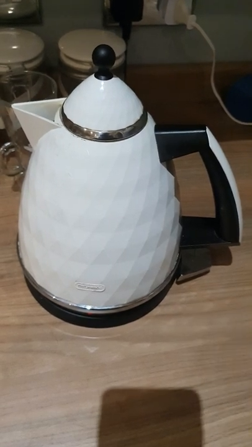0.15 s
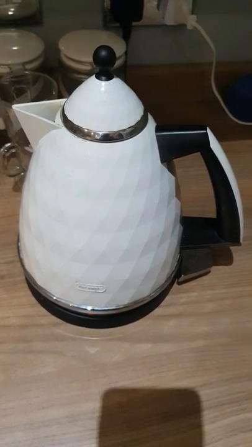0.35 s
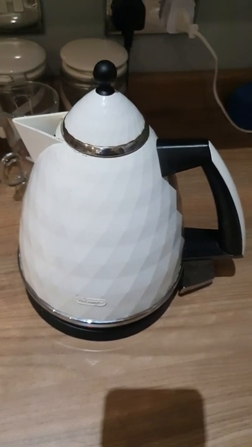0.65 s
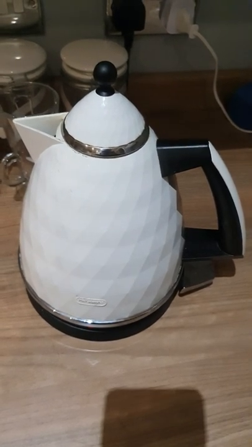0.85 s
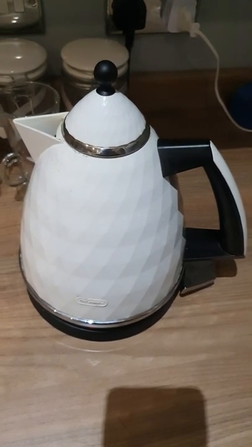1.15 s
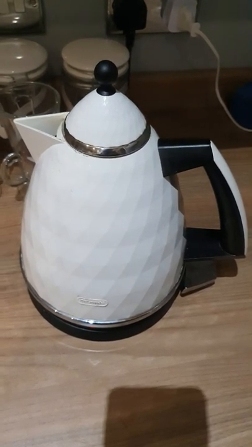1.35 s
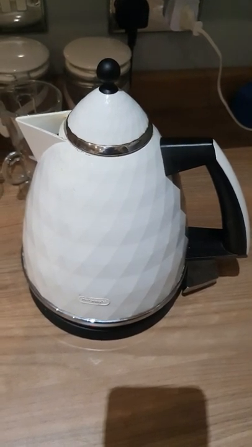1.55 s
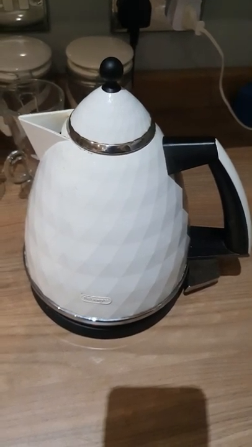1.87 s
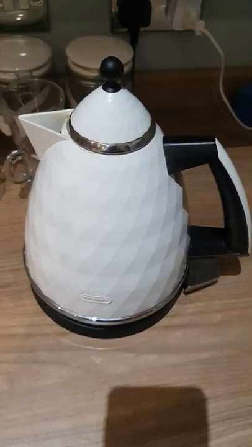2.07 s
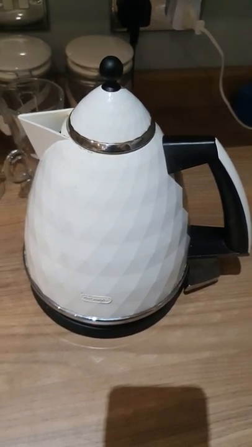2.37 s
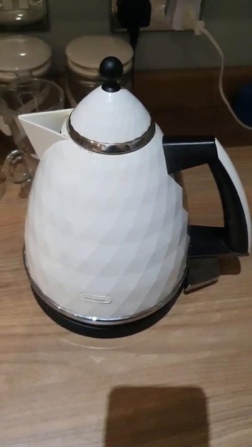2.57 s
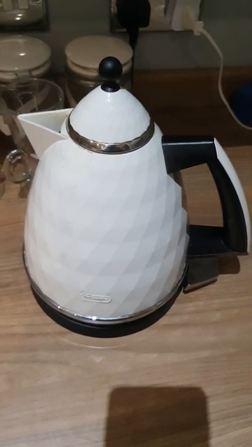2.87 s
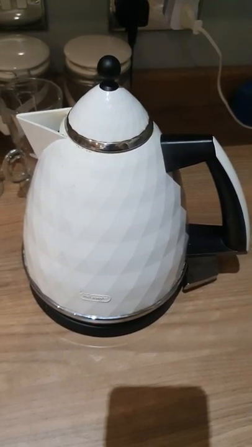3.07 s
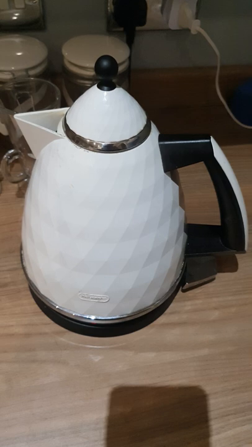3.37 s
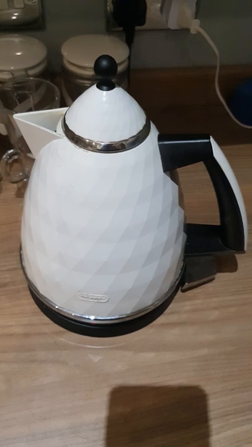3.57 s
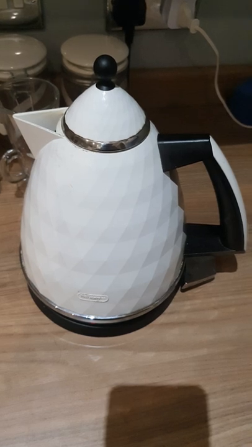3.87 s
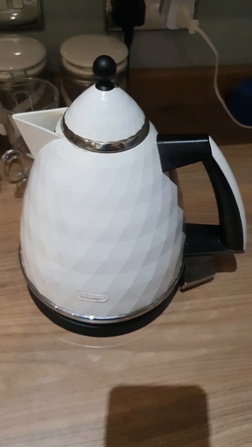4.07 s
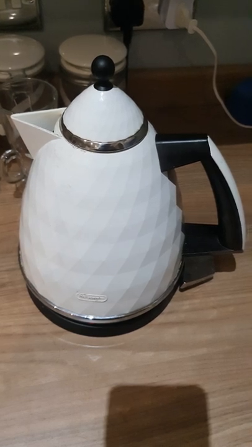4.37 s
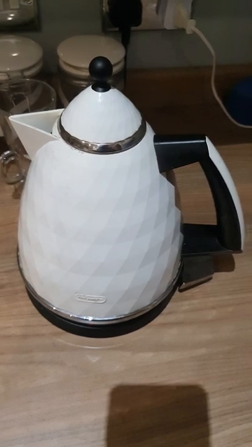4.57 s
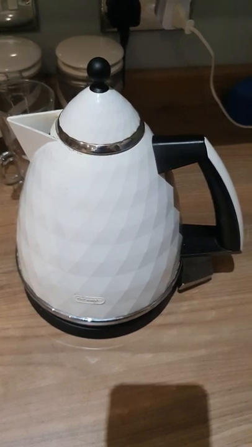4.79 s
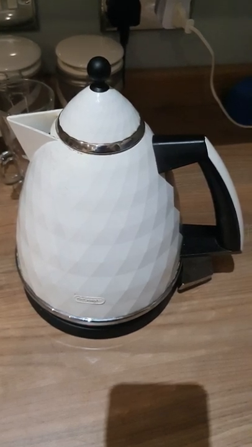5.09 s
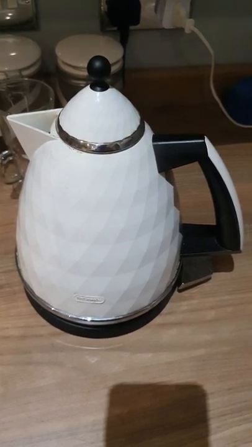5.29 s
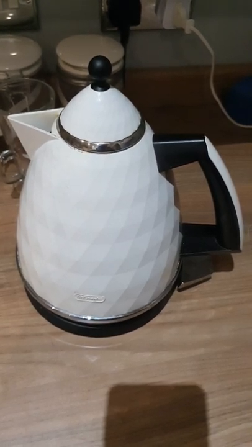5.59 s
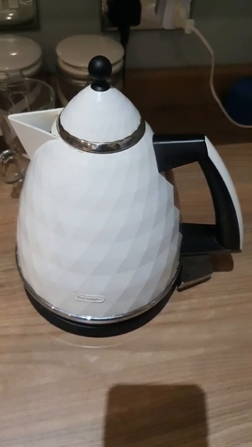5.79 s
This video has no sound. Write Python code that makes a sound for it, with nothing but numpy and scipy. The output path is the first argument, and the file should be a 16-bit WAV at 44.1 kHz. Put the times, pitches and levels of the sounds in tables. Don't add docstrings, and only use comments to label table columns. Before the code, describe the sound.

A handheld phone close to a kettle hears crisp, airy sizzling at first, then its tone abruptly drops to muffled and bassy. The base hums and throbs at a wavering low pitch over deeper thuds in the worktop, with a steady grainy simmer above. Near the middle, skin rubs softly and the case ticks a few times, mostly on the right. It never reaches a full boil and stops abruptly.

```python
import sys
import numpy as np
from scipy import signal
from scipy.fft import rfft, irfft, dct, next_fast_len
from scipy.io import wavfile
from scipy.ndimage import uniform_filter1d

SR = 44100
rng = np.random.default_rng(int(sys.argv[2]) if len(sys.argv) > 2 else 0)


def waveform_to_disk(signal):
    frames = np.transpose(np.atleast_2d(signal))
    scaled = np.clip(frames, -1, 1) * 32767
    samples = np.round(scaled).astype(np.int16)
    wavfile.write(sys.argv[1], SR, samples)


def ratio_of_db(decibels):
    return 10 ** (np.asarray(decibels, float) / 20)


N = 261954
SIZE = next_fast_len(N)
HZ = np.arange(SIZE // 2 + 1) * SR / SIZE
TIME = np.arange(N) / SR
SWITCH_S = 0.6195


def curve(table):
    s, *columns = np.transpose(table)
    return [np.interp(TIME, s, c) for c in columns]


def shape(table, grid_hz=HZ):
    hz, *columns = np.transpose(table)
    return np.array([np.interp(np.log(grid_hz + 1), np.log(hz), c) for c in columns])


def walk(rate_hz):
    hold = int(SR / rate_hz)
    steps = np.repeat(rng.standard_normal(N // hold + 1), hold)
    slewed = uniform_filter1d(uniform_filter1d(steps, hold), hold)
    return 1.43 * slewed[:N]


def swells(rows, rise_db_s, fall_db_s, rest_db):
    level_db = np.full(N, float(rest_db))
    for start_s, hold_s, peak_db, *_ in rows:
        early_s = np.maximum(start_s - TIME, 0)
        late_s = np.maximum(TIME - start_s - hold_s, 0)
        level_db = np.maximum(level_db, peak_db - rise_db_s * early_s - fall_db_s * late_s)
    return level_db


def collapses(level_db):
    return rfft(rng.standard_normal(N) * ratio_of_db(level_db), SIZE) * np.sqrt(SR / 2)


def ring(hz, width_hz):
    return 1 / (1 + 1j * (HZ ** 2 - hz ** 2) / ((HZ + 1) * width_hz))


def whine():
    tone = irfft(collapses(0) * ring(5815, 220) ** 2, SIZE)[:N]
    return tone / np.std(tone) * ratio_of_db(-81) * (TIME < SWITCH_S)


# (start [s], length [s], centre [Hz], width [Hz], level [dB])
BRUSH = [(2.85, 0.094, 1700, 900, -41.5), (2.855, 0.18, 6050, 1340, -63), (2.92, 0.06, 6300, 500, -67),
         (2.908, .13, 11790, 2800, -70), (4.277, 0.31, 4920, 352, -63), (4.268, .31, 5430, 1800, -60),
         (4.303, 0.27, 6600, 400, -64), (4.322, .12, 12430, 2201, -80), (4.46, .12, 13800, 1204, -75),
         (4.47, .09, 6000, 1200, -68), (4.56, .1, 6300, 1000, -72)]
# (start [s], length [s], level [dB])
FLICKS = [(.72, 0.055, -70), (.85, 0.078, -69), (1.68, 0.091, -70), (2.437, .04, -65),
          (2.555, 0.057, -65.5), (2.702, .07, -68), (3.691, 0.051, -67), (4.699, 0.077, -66),
          (5.056, .05, -65), (5.359, 0.041, -63), (5.68, .1, -71)]
# (time [s], peak [dB], ring [Hz])
TICKS = [(2.2286, -48, 6070), (3.1033, -50, 6540), (3.3775, -54.5, 5830), (3.4293, -61, 6290),
         (3.4815, -60.5, 5970), (3.707, -57, 6480)]


def finger():
    out = np.zeros((2, N))
    skin = rfft(rng.standard_normal((2, N)) * ratio_of_db(walk(64)), SIZE)
    flick_hz, flick_width_hz = 6620, 620
    flick_left_db, slide_left_db = -5.5, -13.5
    touches = [(*row, slide_left_db) for row in BRUSH]
    for start_s, length_s, right_db in FLICKS:
        touches.append((start_s, length_s, flick_hz, flick_width_hz, right_db, flick_left_db))
    for start_s, length_s, hz, width_hz, right_db, left_db in touches:
        inside_s = np.minimum(TIME - start_s, start_s + length_s - TIME)
        edge = np.clip(inside_s / (0.022 + 0.36 * length_s) + 0.48, 0, 1)
        hiss = irfft(skin * np.exp(-np.abs((HZ - hz) / width_hz) ** 3), SIZE)[:, :N]
        out += edge ** 2 * hiss / np.std(hiss) * ratio_of_db(right_db + np.array([[left_db], [0]]))
    for start_s, peak_db, hz in TICKS:
        age_s = TIME - start_s
        tick = np.cos(2 * np.pi * hz * age_s) * np.exp(-(age_s / 0.00057) ** 2)
        out += tick * ratio_of_db(peak_db + np.array([[-9], [3]]))
    return out


# (start [s], hold [s], level [dB], pitch [Hz])
SURGES = [(.13, 0, -32.5, 122), (.28, 0, -28, 113.3), (.46, 0.1, -39.5, 122.2), (.64, 0.024, -21.5, 111.3),
          (.73, 0, -16, 111.9), (0.861, 0.34, -23, 114.7), (1.273, 0.12, -23, 113),
          (1.546, 0.078, -21, 113.1), (1.705, 0.18, -21.5, 116.5), (1.948, 0.052, -21.5, 113),
          (2.128, 0.068, -36.5, 112.2), (2.272, 0.18, -26, 117.7), (2.63, 0.0078, -17.5, 115),
          (2.746, 0.21, -20.5, 113.6), (3.027, 0.12, -21.5, 115.4), (3.26, 0.02, -29, 117.3),
          (3.37, 0.0097, -24.5, 118.6), (3.537, 0.045, -22.5, 114.7), (3.738, .33, -26.5, 118.5),
          (4.186, 0.059, -26.5, 115.9), (4.38, 0.011, -15, 115.9), (4.6, 0.018, -19, 115.8),
          (4.78, 0.014, -18, 115.9), (4.879, 0.11, -25.5, 117.5), (5.08, 0.0062, -20, 116.7),
          (5.211, 0.024, -18.5, 118.1), (5.285, 0.11, -24.5, 113.1), (5.54, 0.008, -21, 120.4),
          (5.627, 0.21, -31, 118), (5.93, 0.058, -17.5, 124)]
# (time [s], depth [dB])
STALLS = [
    (1.21, 18),
    (2.05, 4),
    (4.131, 8.5),
    (5.04, 7.5),
    (5.14, 35),
]
# (start [s], hold [s], level [dB])
THUDS = [(.45, 0, -39), (.63, 0.0021, -40), (.83, 0, -34.5), (1.11, 0, -34.5), (1.36, 0.0018, -43.5),
         (1.75, 0.17, -40), (2.2, 0, -30.5), (2.46, 0, -38), (2.68, 0.28, -39), (3.27, .25, -37.5),
         (4.25, 0.014, -38.5), (4.62, 0.072, -38), (4.81, 0.00058, -36), (5.13, 0, -37), (5.5, 0.073, -35),
         (5.74, 0, -36), (5.94, 0, -29)]
# (centre [Hz], width [Hz], level [dB per Hz])
WORKTOP = [(78, 24, -55.5), (99.5, 12, -49), (114.7, 23.6, -45.5), (130.26, 12.5, -41.5), (149, 17.4, -45),
           (177.3, 24, -58)]


def boom():
    bright = TIME < SWITCH_S
    lost_db = 15 * bright

    (hz,) = curve([(start_s + hold_s / 2, pitch_hz) for start_s, hold_s, _, pitch_hz in SURGES])
    boom_db = swells(SURGES, rise_db_s=231.5, fall_db_s=199, rest_db=-44)
    stall_s = 0.06
    for s, depth_db in STALLS:
        boom_db = boom_db - depth_db * np.clip(1 - np.abs(TIME - s) / stall_s, 0, 1)
    phase = 2 * np.pi * np.cumsum(hz) / SR + 0.48 * walk(22)
    swing = np.sqrt(2) * ratio_of_db(boom_db + lost_db - 1 + 1.2 * walk(25)) * np.sin(phase)

    rumble_db = swells(THUDS, rise_db_s=90.5, fall_db_s=112, rest_db=0 * SWITCH_S - 42)
    rest_db = -42 - 5.5 * bright
    rumble_db = np.where(rumble_db > -42, rumble_db, rest_db)
    rumble_db = np.maximum(rest_db, swells(THUDS, rise_db_s=90.5, fall_db_s=112, rest_db=-200))
    rumble = irfft(collapses(0) * ring(49, 22) * ring(60, 30), SIZE)[:N]
    rumble = rumble / np.sqrt(uniform_filter1d(rumble ** 2, int(0.12 * SR)))
    rumble = rumble * ratio_of_db(rumble_db + 0.69 * lost_db - 0.5)

    top = 0
    for centre_hz, width_hz, db in WORKTOP:
        top = top + ratio_of_db(db) * collapses(0) * ring(centre_hz, width_hz) * ring(centre_hz, 1.47 * width_hz)
    top = irfft(top, SIZE)[:N] * ratio_of_db(0.084 * (boom_db + lost_db + 28.5))

    bass = rfft(swing + rumble + top, SIZE)
    bass = irfft(bass / (1 + (28 / (HZ + 1)) ** 6), SIZE)[:N]
    return np.array([bass, ratio_of_db(0.2) * np.roll(bass, 2)])


# (time [s], level [dB])
SIMMER = [
    (0, -1.5),
    (.23, -1.5),
    (.4, 0),
    (.7, 2),
    (.85, 2.5),
    (1.3, 1),
    (2.5, 0.5),
    (3.9, -.5),
    (5.1, -1),
    (5.94, -0.5),
]
# (start [s], hold [s], level [dB])
BURSTS = [(.45, 0.25, -26), (.99, 0, -30), (1.14, 0, -28), (1.44, 0, -38.5), (1.7, .15, -27.5),
          (2.41, 0, -33), (3.5, 0.17, -35), (4.13, 0.024, -35), (4.58, 0.012, -27), (5.26, 0.13, -28.5),
          (5.77, 0.0079, -35.5)]
# (centre [Hz], width [Hz], left [dB per Hz], right [dB per Hz], right phase [rad])
SHELL = [(247.4, 25.4, -58, -57.5, 0.49), (305.6, 27.6, -56.5, -52.5, -0.5), (346, 18.2, -62.5, -52, 0.47),
         (376, 29, -53, -52, -0.45), (401.2, 22.3, -59, -55.5, 0.6), (480.2, 35, -69, -64, 0.2),
         (681, 100, -81, -77, 0.63), (789, 80, -70.5, -77, 0.5), (837, 64, -85, -65, 0.45),
         (1023, 100, -75.5, -71, 3.5), (1138, 62, -78.5, -68.5, 3.5), (1249, 82, -82, -73.5, -2.5),
         (1465, 50, -75.5, -77, -2), (1643, 130, -81.5, -78, -1.5), (2122, 190, -78, -91, -2.5),
         (2322, 74, -85, -80.5, -1), (2506, 97, -74.5, -83, -2), (2800, 110, -91.5, -85, -1.5),
         (3556, 110, -89.5, -90.5, 4.5), (4070, 260, -93.5, -91, 1.75), (4625, 340, -101, -100.5, -2),
         (5970, 270, -106, -103, 2.0), (6600, 500, -107, -102, 1.5)]
# (frequency [Hz], left [dB per Hz], right [dB per Hz], side minus mid [dB])
WASH = [(130, -95.5, -92, -20), (203, -72, -66.5, -8), (460, -75.5, -70.5, -5), (1000, -77, -78, -0.5),
        (1870, -84, -90.5, -2.5), (2980, -90.5, -96, -5), (4980, -102, -101, -1.5), (6800, -107, -104, 5),
        (7370, -120, -122, -7.5), (8200, -119, -126, -1.5), (9200, -112, -120, 3.5),
        (11400, -114, -116, 1.5), (12000, -117, -117, 3.5), (15600, -120, -121, -7.5)]


def simmer():
    (sizzle_db,) = curve(SIMMER)
    shell_db = swells(BURSTS, rise_db_s=79, fall_db_s=110, rest_db=-43)
    shell_db = 0.15 * (shell_db - np.mean(shell_db))
    surge_db = 0.43 * walk(30) + 0.53 * walk(90) + 1.3 * walk(500)

    rung = 0
    for hz, width_hz, left_db, right_db, phase_rad in SHELL:
        high = np.clip(hz / 1200, 0, 1)
        drive = collapses((1 - high) * shell_db + high * (sizzle_db + surge_db))
        ports = np.array([[ratio_of_db(left_db)], [ratio_of_db(right_db) * np.exp(1j * phase_rad)]])
        rung = rung + ports * (drive * ring(hz, width_hz) * ring(hz, 1.85 * width_hz))
    rung = rung / (1 + (HZ / 6880) ** 40)

    *ports_db, side_db = shape(WASH)
    wash_db = sizzle_db + 0.39 * surge_db
    norm = np.sqrt(1 + ratio_of_db(2 * side_db))
    mid = collapses(wash_db) / norm
    side = collapses(wash_db) * ratio_of_db(side_db) / norm
    wash = ratio_of_db(np.array(ports_db)) * np.array([mid + side, mid - side])
    return irfft(rung + wash, SIZE)[:, :N]


def scene():
    return whine() + finger() + boom() + simmer()


def band_limit(x):
    return signal.sosfilt(signal.butter(12, 15740, fs=SR, output="sos"), x)


# (frequency [Hz], left [dB], right [dB])
BRIGHT = [(30.37, -10.5, -10), (65, -14.5, -14), (142, -13, -15.5), (203, -12, -9.5), (291, 3, 4),
          (416, 1.5, -1.5), (523, 8, 10.5), (576, 8.5, 5), (960, 11, 10.5), (1070, 16, 11.5),
          (2440, 16, 18.5), (6800, 22, 18), (8000, 25, 22.5), (15600, 21.5, 22)]
# (centre [Hz], width [Hz], left [dB], right [dB])
AIM = [(1337, 63, 0.5, 4.5), (1530, 150, -2, -5), (1940, 78, 2, 4), (2070, 80, -4, -6), (2492, 65, -5, -9),
       (3210, 70, 10, 3), (3510, 130, -4, -2), (4060, 50, -2, -7), (7250, 148, 3, 5), (297, 44, 1.5, 1.5),
       (390, 30, -2.5, 0), (5800, 76, 1.5, 8), (2400, 65, 1.5, -1.5), (14500, 1500, 4.5, 4)]


def record(dry):
    size, lag = 2 ** 15, 6
    head = np.array([np.roll(dry[0], lag), dry[1]])[:, lag:size + lag]
    grid_hz = np.arange(size) * SR / (2 * size)
    gain_db = shape(BRIGHT, grid_hz)
    for hz, width_hz, *ports_db in AIM:
        gain_db = gain_db + np.outer(ports_db, np.exp(-((grid_hz - hz) / width_hz) ** 2))
    bright = dct(dct(head, norm="ortho") * ratio_of_db(gain_db), type=3, norm="ortho")

    dull_fade = np.clip((TIME - SWITCH_S) / 0.014 + 0.1, 0, 1) * (TIME > SWITCH_S - 0.002)
    out = dry * dull_fade
    out[:, :size] += bright * np.clip((SWITCH_S - TIME[:size]) / 0.0024, 0, 1)
    thump_db, thump_s = -35, 0.006
    out = out + ratio_of_db(thump_db) * np.exp(-((TIME - SWITCH_S - 0.003) / thump_s) ** 2)
    out = out * np.sin(np.pi / 2 * np.clip((TIME[-1] - TIME) / 0.003, 0, 1)) ** 2
    return band_limit(np.tanh(2.2 * out) / 2.2)


dry = scene()
out = record(dry)
waveform_to_disk(out)
```